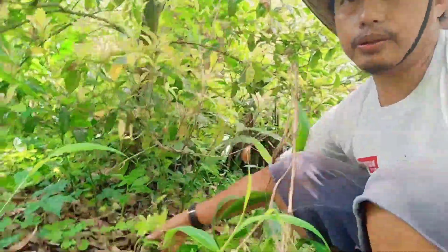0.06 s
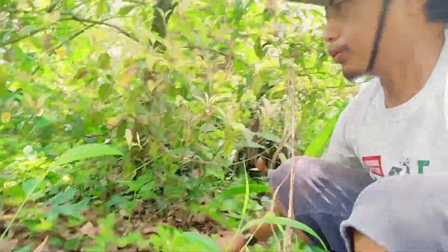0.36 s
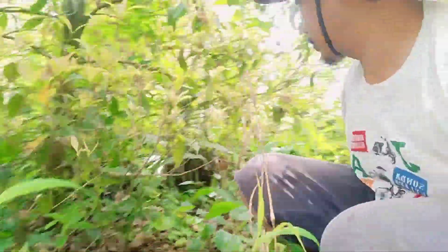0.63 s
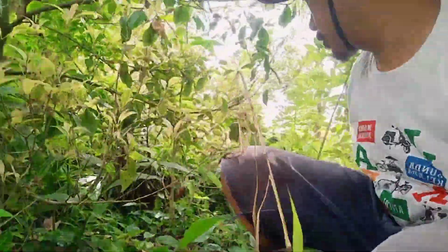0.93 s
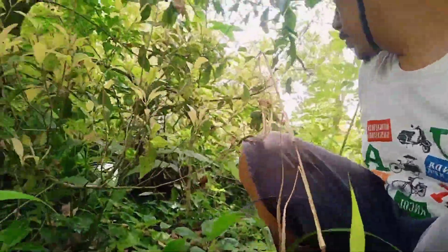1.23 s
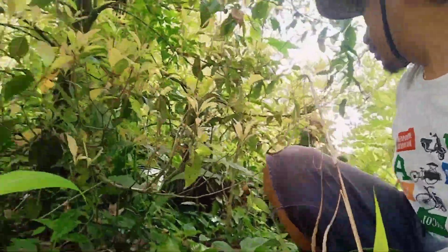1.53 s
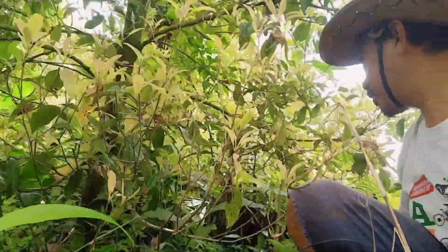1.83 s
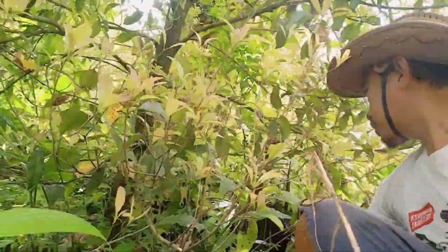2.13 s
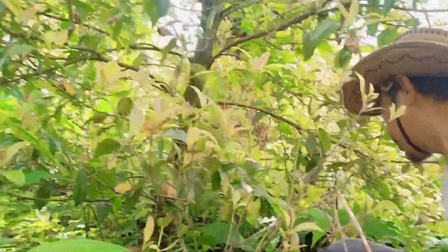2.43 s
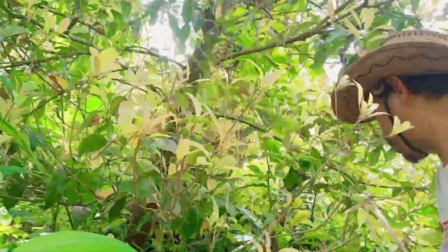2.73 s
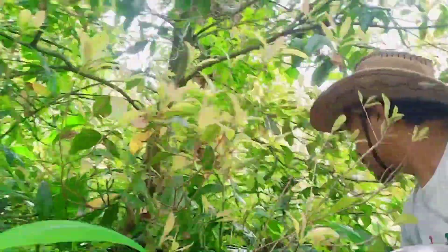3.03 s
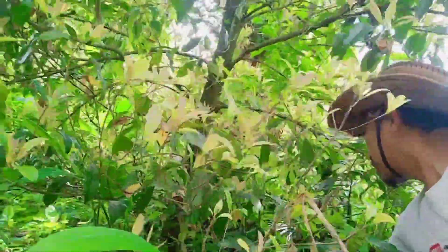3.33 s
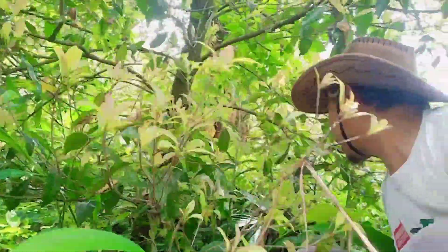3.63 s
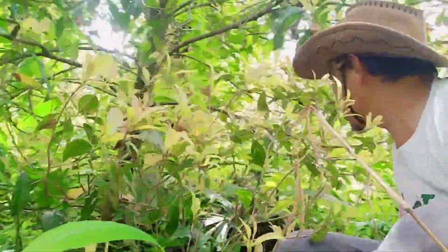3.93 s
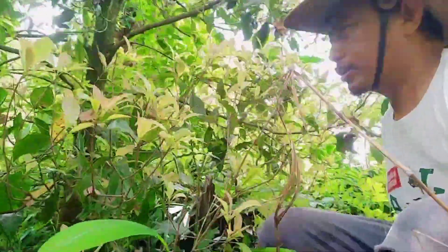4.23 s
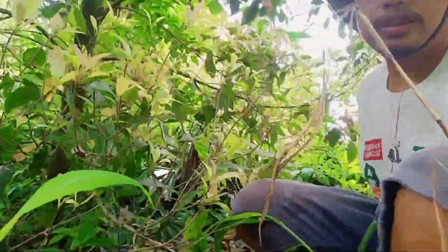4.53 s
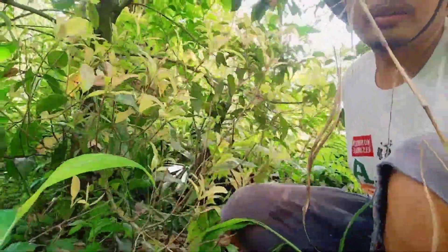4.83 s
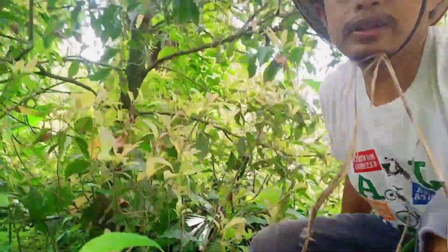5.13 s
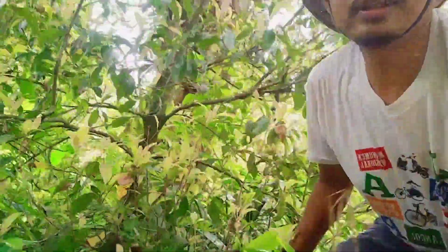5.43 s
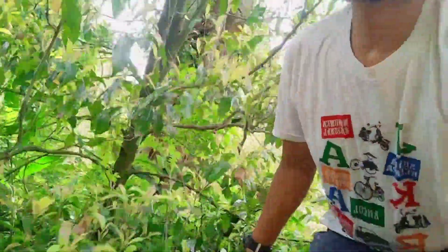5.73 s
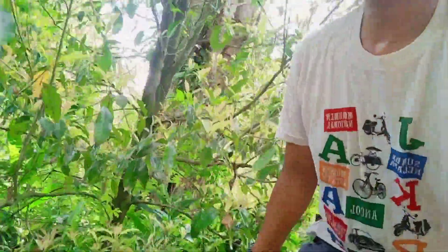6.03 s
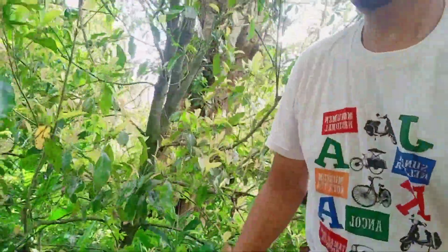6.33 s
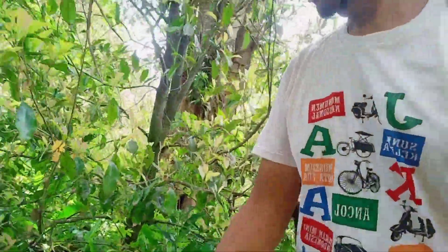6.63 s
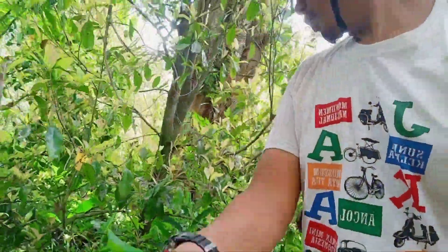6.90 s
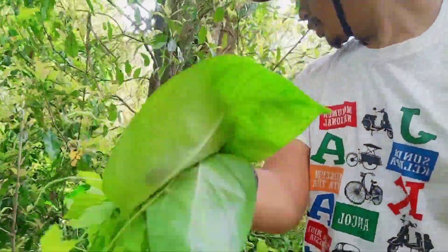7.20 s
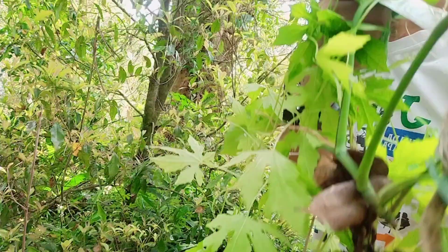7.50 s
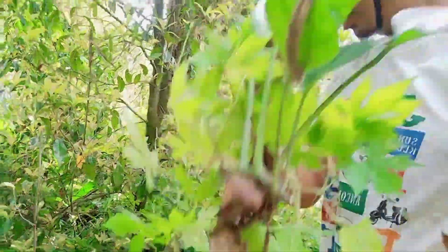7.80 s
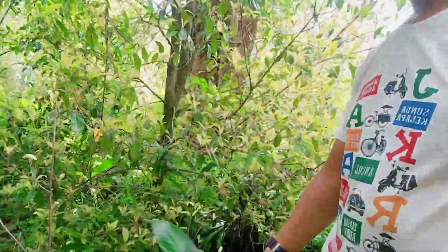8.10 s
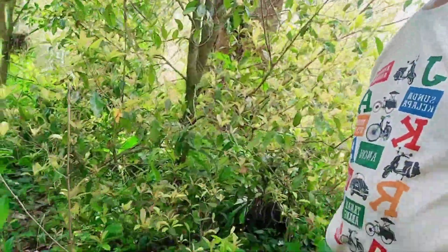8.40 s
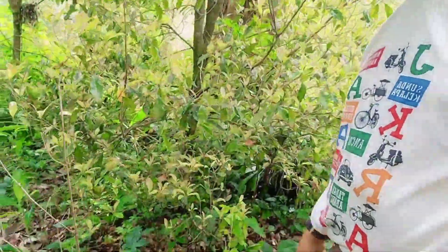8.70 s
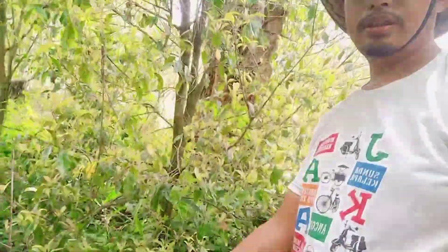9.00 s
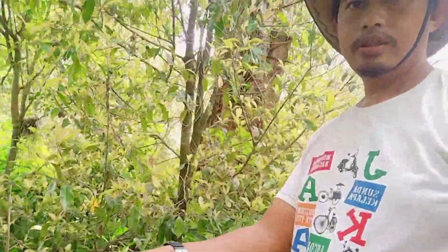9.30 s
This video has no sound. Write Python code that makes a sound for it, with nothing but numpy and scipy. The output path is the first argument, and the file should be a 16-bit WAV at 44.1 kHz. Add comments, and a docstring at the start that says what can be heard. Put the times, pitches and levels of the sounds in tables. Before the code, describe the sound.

Cicadas buzz and whine steadily in a thicket while, close by, leaves rustle and stems snap as a plant is pulled up.

```python
"""Cicadas and plant pulling in a tropical thicket

A near cicada buzzes by clicking its tymbals, the ribbed drums on its body. Another whines in a steady
beat, a shrill one winds up again and again, and a far chorus hisses behind them.
Close by, someone crouches and pulls up a plant: leaves swish and crackle, stems snap, soil and
knees thud. Both ears hear the same sound."""
import sys
import numpy as np
from scipy import signal
from scipy.io import wavfile
from scipy.ndimage import uniform_filter1d

SR = 44100
rng = np.random.default_rng(int(sys.argv[2]) if len(sys.argv) > 2 else 0)


def wrap_up_sound(samples):
    """Save the sound to the file named by the first command line argument, as 16-bit audio."""
    columns = np.atleast_2d(samples).T
    # keep every value between -1 and 1, then stretch to whole-number steps
    tamed = np.clip(columns, -1, 1)
    steps = np.round(tamed * 32767).astype(np.int16)
    wavfile.write(sys.argv[1], SR, steps)


N = 421155
TIME = np.arange(N) / SR

# how fast the near cicada clicks: (time [s], rate [clicks/s])
CLICK_RATE = [(0, 263), (.9, 250), (1.5, 250), (2, 253), (2.8, 278), (3.4, 278), (4.1, 270), (4.7, 275),
              (5.3, 277), (5.9, 307), (6.6, 290), (7.3, 290), (9.55, 304)]
# how loudly its body rings: (time [s], relative belly level [dB], relative tymbal plate level [dB])
BODY_LEVELS = [(0, -56, -47), (.9, -46.5, -43), (1.3, -53, -44.5), (1.6, -43.5, -42.5), (2.5, -40.5, -39.5),
               (2.82, -46, -39), (3.13, -42, -42.5), (3.68, -40, -39), (3.98, -42, -46),
               (4.3, -46.5, -40.5), (4.62, -39.5, -43.5), (4.92, -38.5, -42.5), (5.5, -52, -42),
               (5.95, -43, -45.5), (6.4, -49.5, -45.5), (7.55, -42, -47.5), (8.22, -62, -47),
               (9.55, -58, -45.5)]
# the whining insect at the top of its calls: (time [s], whine [dB], whistle [dB])
WHINE_LEVELS = [(.2, -47, -59), (.9, -48, -65), (1.55, -49, -61.5), (2.3, -58.5, -58.5),
                (3.6, -46.5, -59.5), (5, -47.5, -64), (5.7, -48.5, -58), (6.35, -44, -62.5),
                (7.7, -42.5, -63), (8.4, -48, -62.5), (9.1, -50, -64)]
# the shrill insect's calls: (time of the top [s], climb [s], relative level [dB], top pitch [Hz])
SHRILL_CALLS = [(1.5, 0.2, -46.5, 3870), (2.95, 0.46, -47, 3890), (4.55, 0.35, -47.5, 4120),
                (5.88, 0.64, -43.5, 4010), (7.2, 0.67, -49, 3850), (8.45, 0.89, -45.5, 4075),
                (9.48, 0.34, -45, 4010)]
# the tones in its voice: (multiple of the pitch, width [Hz], relative level [dB])
SHRILL_TONES = [(1.001, 119, -3), (1.109, 221, -8.5), (1.5, 500, -6.5), (2.02, 710, -7), (2.25, 1030, -14)]
# hand strokes, with relative levels: (start [s], length [s], leaves [dB], stems [dB], soil [dB])
HAND_STROKES = [ (0, 0.11, -36.5, -49, -58), (0.376, .045, -35, -43.5, -47.5),
                (0.551, 0.017, -40.5, -42, -60), (0.676, 0.14, -47.5, -72, -79),
                (1.007, 0.17, -44.5, -52, -59.5), (1.233, 0.032, -42.5, -53, -59),
                (1.785, 0.14, -41, -53, -61), (1.943, 0.22, -40.5, -50, -58), (2.125, 0.034, -35, -43, -43),
                (2.188, 0.043, -34, -49, -47), (2.256, 0.17, -40.5, -49, -49.5), (2.68, .1, -52, -67, -68),
                (2.808, 0.21, -40.5, -51.5, -53.5), (3.032, 0.31, -41, -61, -54.5),
                (3.359, 0.25, -38.5, -53, -51.5), (3.983, 0.07, -52, -61, -73), (4.45, 0.21, -49, -57, -57),
                (4.717, 0.29, -50, -57, -64), (5.355, 0.21, -44, -55, -63), (5.667, 0.11, -36.5, -57, -61),
                (5.808, 0.19, -39, -49, -54), (6.076, 0.26, -46, -61, -59), (6.536, 0.078, -35, -42.5, -54),
                (6.828, 0.15, -42.5, -50.5, -59.5), (6.98, 0.11, -39.5, -45, -47.5),
                (7.15, 0.062, -46, -55, -56), (7.53, .09, -50, -69, -78), (8.2, 0.06, -58, -69, -78),
                (9.41, 0.018, -39.5, -39.5, -60)]
# faint stirring between strokes, on the same scale: (leaves [dB], stems [dB], soil [dB])
STIR_DB = (-58.5, -59.5, -66)
# broad resonances of a leaf: (pitch [Hz], width [Hz], relative level [dB])
LEAF_RINGS = [(2000, 4800, -19), (2860, 2660, -3), (7290, 2670, 2.5), (9860, 1700, -10), (13750, 4470, 6.5)]
# hollow sound of rubbed stems: (frequency [Hz], relative level [dB])
STEM_COLOUR = [(700, -36.5), (1000, -9), (1450, -3.5), (2000, 2), (3200, -1), (6000, -19)]
# dull scuff of soil: (frequency [Hz], relative level [dB])
SOIL_COLOUR = [(40, 4), (120, -6), (260, -2), (500, -2), (800, 0), (1200, -2.5)]
# stems snapping: (time [s], peak [dB], woody ring [Hz])
STEM_SNAPS = [(0.189, -32.5, 1610), (0.429, -25, 1100), (0.561, -16.5, 1680), (0.566, -17.5, 1860),
              (0.57, -28, 1690), (.597, -30, 1490), (1.264, -48, 1700), (1.407, -21, 5450),
              (2.120, -28, 1260), (2.141, -23, 1360), (2.290, -23.5, 1480), (2.351, -29, 1430),
              (2.824, -27, 1435), (2.96, -28, 1697), (3.612, -27, 2230), (3.657, -19, 2420),
              (5.203, -32, 1620), (5.964, -26.5, 1480), (6.14, -37, 900), (6.311, -27, 1920),
              (6.47, -36, 1600), (6.61, -26, 1192), (6.647, -22, 2070), (6.87, -29, 5000),
              (7.016, -23, 2220), (7.16, -31.5, 1600), (7.845, -30, 1400), (7.859, -29.5, 1770),
              (8.468, -40, 810), (8.482, -53, 600), (9.18, -38, 1700), (9.436, -26, 1762)]
# dry leaves cracking: (time [s], peak [dB])
LEAF_CRACKS = [(.407, -24), (.422, -18), (1.121, -31), (1.192, -24), (1.813, -23.5), (2.131, -23),
               (2.208, -26), (2.339, -20), (2.399, -21), (2.417, -16.5), (3.504, -16), (3.554, -26),
               (3.658, -18), (4.085, -27), (4.628, -21.5), (5.348, -32), (5.710, -27), (6.554, -18),
               (7.016, -29), (7.222, -19)]
# knees, roots and clods hitting soft soil: (time [s], peak [dB], pitch [Hz])
SOIL_THUDS = [(0.442, -37, 122), (0.563, -34.5, 400), (.569, -40, 190), (.598, -44, 300), (1.036, -52, 213),
              (1.202, -49, 125), (1.258, -45, 350), (1.613, -54, 121), (2.112, -40, 41.7),
              (2.178, -33, 210), (2.203, -40, 110), (2.288, -38, 248), (2.42, -47, 150.2),
              (3.735, -45.5, 132), (4.718, -41, 186), (5.082, -49, 54.7), (5.189, -50, 49.8),
              (5.533, -41, 236), (6.226, -48, 169.4), (7.015, -42, 90), (7.048, -31.5, 228),
              (7.065, -47, 70), (7.115, -47, 45.4), (7.216, -46, 67), (7.847, -31.5, 320),
              (7.855, -40, 79.4), (8.075, -53, 78.4)]
# voices of the far chorus: (pitch [Hz], width [Hz], relative level [dB])
CHORUS_VOICES = [(1370, 91, -72), (2368, 180, -50), (2782, 180, -50), (3150, 250, -51.5), (3497, 340, -50),
                 (4320, 1040, -50), (5845, 860, -50.5), (7020, 1250, -51.5), (7880, 580, -48.5)]
# rise and fall of the whole chorus: (time [s], gain [dB])
CHORUS_GAIN = [(0, -2), (.7, -5), (1.5, -2.5), (3, -1), (5.2, -1.5), (6, -1), (7, -1), (7.8, -0.5),
               (9.55, 0)]
# air and distant hiss: (frequency [Hz], relative level [dB])
AIR_COLOUR = [(25, 7), (60, 5), (150, -4.5), (400, -9.5), (800, -14), (1300, -35), (1900, -27),
              (2800, 13.5), (5000, -9), (8500, 5), (10500, -3.5), (13500, 2), (15500, 5)]


def near_cicada(easy_clicks_per_s=270, ribs=8):
    """Ribs buckle one by one, eight to a muscle stroke, and ring the belly and the tymbal plate."""
    rate, = in_time(CLICK_RATE)
    phase = np.cumsum(rate * (1 + .003 * drift(20))) / SR
    # clicks crowd together and grow louder once in each stroke
    phase += .09 * np.sin(2 * np.pi * phase / ribs)
    stroke = 1 + .2 * np.cos(2 * np.pi * phase / ribs)
    clicks = np.diff(np.floor(phase), prepend=0)
    spit = .19 * rng.standard_normal(N) * np.exp(-(phase % 1) / .2)  # each buckle is rough
    wash = .5 * rng.standard_normal(N)  # song scattered by leaves and trunks
    drive = rms_one(stroke * (clicks + spit)) + wash
    # the body tightens with effort, so it rings higher
    effort = rate / easy_clicks_per_s
    belly_hz = 2684 * effort ** .17 * (1 + .008 * drift(3.6))
    plate_hz = 3514 * effort ** .39
    belly = evened(resonate(drive, belly_hz, width_hz=145))
    plate = evened(resonate(drive, plate_hz, width_hz=370))
    plate += from_db(-17) * rms_one(resonate(drive, plate_hz * 1.27, width_hz=540))
    belly_db, plate_db = in_time(BODY_LEVELS)
    song = from_db(belly_db) * belly + from_db(plate_db + .5) * plate
    return from_db(.62 * drift(7)) * band(song, 2010, 9000, order=4)


def whining_insect(first_s=.23, every_s=.68, whistle_lead_s=.017, fade_db_per_s=.74):
    """A whine, an overtone and a soft whistle an octave below swell together, call after call."""
    def lull(time):
        """0 at the top of a call, 1 midway between calls."""
        return 1 - np.abs(np.cos(np.pi * (time - first_s) / every_s)) ** 1.47

    whine_db, whistle_db = in_time(WHINE_LEVELS)
    whine_db -= 11 * lull(TIME)
    whistle_db -= 4.5 * lull(TIME + whistle_lead_s)
    overtone_db = whine_db - 3 - fade_db_per_s * (TIME - TIME.mean())
    waver = 1 + .004 * drift(1.1)
    whine = from_db(whine_db) * singer(2345 * waver, width_hz=70)
    overtone = from_db(overtone_db) * singer(3520 * waver, width_hz=85)
    whistle = from_db(whistle_db) * singer(1158 * (1 + .008 * drift(1.7)), width_hz=46)
    return whine + overtone + whistle


def shrill_insect(climb_db=8, let_go_s=.16, glide_hz_per_s=550, sizzle_lead_s=.096):
    """Each call climbs in loudness and pitch to its top, then dies away fast."""
    top_s, climb_s, top_db, top_hz = np.transpose(SHRILL_CALLS)[:, :, None]
    since_top = TIME - top_s
    slack = np.maximum(-since_top / climb_s, since_top / let_go_s)
    gains = from_db(top_db - climb_db * np.minimum(slack, 3) ** 2)
    level = gains.sum(axis=0)
    glides_hz = top_hz + glide_hz_per_s * np.clip(since_top, -1, 0)
    pitch_hz = (gains * glides_hz).sum(axis=0) / level  # the loudest call leads
    tone = level * sum(from_db(db) * singer(pitch_hz * k, width) for k, width, db in SHRILL_TONES)
    # each call carries a high sizzle that swells and fades more evenly
    sizzle_gain = from_db(-47 - 10 * ((since_top + sizzle_lead_s) / climb_s) ** 2).max(axis=0)
    return ground_echo(tone) + sizzle_gain * singer(8140, width_hz=3400, order=4)


def hand_levels(grip_s=.004, build_db=4.5, release_s=.033, settle_s=.22, plant_free_s=6.7):
    """Leaf, stem and soil levels in dB: each stroke grips, pulls tight and lets go; the plant settles."""
    stir_drop = from_db(-8 * (TIME > plant_free_s))
    power = np.outer(from_db(STIR_DB), stir_drop) ** 2
    for start, length, *levels_db in HAND_STROKES:
        at = int(start * SR)
        t = TIME[:min(2 * SR, N - at)]
        after = np.maximum(t - length, 0)
        grip = 1 - np.exp(-t / grip_s)
        pull = grip * from_db(build_db * np.minimum(t / length - 1, 0))
        settle = from_db(-11.5) * np.exp(-after / settle_s)
        release = np.maximum(np.exp(-after / release_s), settle)
        power[:, at:at + len(t)] += np.outer(from_db(levels_db), pull * release) ** 2
    return 10 * np.log10(power)


def rustle(catches_per_s=90, settle_s=.0075):
    """Clumps of tiny slips: bright from leaves, hollow from stems, dull from soil."""
    leaf_db, stem_db, soil_db = hand_levels()
    busy = from_db((leaf_db - leaf_db.max()) / 2)  # harder handling makes more leaves slip
    # a leaf catches, lets go all at once and settles
    catches = (rng.random(N) < catches_per_s * busy / SR) * np.minimum(rng.exponential(1, N), 2)
    clumps = 1 + .79 * signal.lfilter([1], [1, -np.exp(-1 / (settle_s * SR))], catches + 1e-18)
    leaf_slips = grains(per_s=26000 * busy)[0] * clumps / np.sqrt(busy)
    leaves = from_db(leaf_db + 2) * leaf_ring(leaf_slips)
    # stems and soil are dragged by the same uneven pull
    slips = grains(per_s=1800) * from_db(2 * drift(38))
    stems = from_db(stem_db + 3) * coloured(slips, STEM_COLOUR, flicker_db=1)
    soil = from_db(soil_db - 1) * coloured(slips, SOIL_COLOUR, flicker_db=4.5)
    return leaves + stems + soil


def leaf_ring(x):
    """Slips and cracks ring a leaf's broad resonances."""
    return rms_one(sum(from_db(db) * rms_one(resonate(x, hz, width)) for hz, width, db in LEAF_RINGS))


def snaps_and_thuds(woody_db=3):
    """Stems snap with a woody ring, dry leaves tick, soft blows on the soil thud."""
    out = np.zeros(N)
    for s, db, hz in STEM_SNAPS:
        crack = burst(decay_s=.00076) + .037 * burst(decay_s=.016)
        wood = from_db(woody_db) * rms_one(resonate(crack, hz, hz * .36))
        add(out, s, db, rms_one(band(crack, hz / 2, hz * 2.5)) + wood)
    for s, db in LEAF_CRACKS:
        crack = burst(decay_s=.00078) + .2 * burst(decay_s=.01)
        add(out, s, db, band(leaf_ring(crack), 4900, 17000, order=1))
    for s, db, hz in SOIL_THUDS:
        add(out, s, db, band(burst(decay_s=.0068), hz * .5, hz * 1.48))
    return out


def far_chorus(swell_db=2):
    """Far cicadas swell and waver, each around its own pitch."""
    chorus = 0
    for hz, width_hz, db in CHORUS_VOICES:
        voice = singer(hz * (1 + .02 * drift(1.8)), width_hz, order=3)
        chorus += voice * from_db(db + swell_db * drift(3.4))
    return chorus * from_db(in_time(CHORUS_GAIN)[0])


def ground_echo(x, strength=.66, delay_s=.0036):
    """Add a dull bounce off the ground, whose path shifts as the microphone moves."""
    lag_s = delay_s * (1 + .052 * drift(.61))
    return x + strength * np.interp(TIME - lag_s, TIME, band(x, 650, 6000, order=1))


def air():
    """A soft, flickering bed of air and distant hiss."""
    return from_db(-48) * coloured(rng.standard_normal((2, N)), AIR_COLOUR, flicker_db=1.9)


def singer(hz, width_hz, order=2):
    """A distant insect: its clicks blur into noise around one pitch."""
    return evened(resonate(rng.standard_normal(N), hz, width_hz, order))


def evened(voice):
    """Hold a voice's loudness fairly even, as an insect does."""
    power = uniform_filter1d(voice ** 2, size=520)
    return rms_one(voice / (power + .1 * power.mean()) ** .3)


def grains(per_s, spread_db=2.5):
    """Two streams of tiny clicks at random moments, a few much larger than the rest."""
    sizes = from_db(spread_db * np.minimum(rng.exponential(1, (2, N)), 4.5))
    return (rng.random((2, N)) < per_s / SR) * sizes * rng.choice([-1, 1], (2, N))


def burst(decay_s):
    """A short spray of noise that dies away."""
    t = TIME[:SR // 6]
    return rng.standard_normal(len(t)) * np.exp(-t / decay_s)


def add(out, s, peak_db, sound):
    """Mix in a short sound at a given time and peak level."""
    at = int(s * SR)
    out[at:at + len(sound)] += (from_db(peak_db) * sound / np.abs(sound).max())[:N - at]


def coloured(sources, spectrum, flicker_db):
    """Two sources take turns filling half-octave bands, each with its own level and flicker."""
    hz, db = np.transpose(spectrum)
    edges = np.geomspace(20, 17000, 21)
    out = np.zeros(N)
    for k, (low, high) in enumerate(zip(edges, edges[1:])):
        if high > hz[0] and low < hz[-1]:
            level = np.interp(np.log(low * high) / 2, np.log(hz), db)
            out += from_db(level + flicker_db * drift(16)) * band(sources[k % 2], low, high)
    return rms_one(out)


def resonate(x, hz, width_hz, order=2):
    """Make a sound ring around a pitch that may move; a higher order cuts the rest more steeply."""
    turn = np.exp(2j * np.pi * np.cumsum(hz + np.zeros(len(x))) / SR)
    r = np.exp(-np.pi * width_hz * np.sqrt(order) / SR)
    y = x / turn + 1e-18  # shift the pitch down to zero, smooth, then shift back
    for _ in range(order):
        y = signal.lfilter([1 - r], [1, -r], y)
    return (y * turn).real


def band(x, low_hz, high_hz, order=2):
    """Keep what lies between two frequencies."""
    sos = signal.butter(order, [low_hz, min(high_hz, SR * .45)], "band", fs=SR, output="sos")
    return signal.sosfilt(sos, x + 1e-18)


def drift(rate_hz):
    """A smooth random wander, about 1 in size."""
    step = 40  # samples between points
    r = np.exp(-2 * np.pi * rate_hz * step / SR)
    slow = signal.lfilter([1], [1, -2 * r, r * r], rng.standard_normal(N // step + 2002))[2000:]
    return np.interp(np.arange(N) / step, np.arange(len(slow)), rms_one(slow))


def in_time(rows):
    """Join a table's points with straight lines, one curve for each column after the time."""
    s, *columns = np.transpose(rows)
    return [np.interp(TIME, s, column) for column in columns]


def from_db(db):
    """Turn decibels into a gain."""
    return 10 ** (np.asarray(db) / 20)


def rms_one(x):
    """Scale a sound so its average strength (rms) is 1."""
    return x / np.sqrt(np.mean(x ** 2) + 1e-20)


def scene(dip_at_s=.547, dip_width_s=.053, dip_db=17):
    """Mix insects, plants and air; the near cicada and the whining insect dip briefly once."""
    hiss = air()
    dip = from_db(-dip_db * np.exp(-((TIME - dip_at_s) / dip_width_s) ** 2))
    insects = dip * (near_cicada() + whining_insect()) + ground_echo(far_chorus()) + shrill_insect()
    mono = insects + rustle() + snaps_and_thuds() + hiss
    return np.array([mono, mono])


def record(dry):
    """Cut the treble steeply above 15500 Hz."""
    return signal.sosfilt(signal.ellip(12, .2, 80, 15500, fs=SR, output="sos"), dry)


dry = scene()
out = record(dry)
wrap_up_sound(out)
```